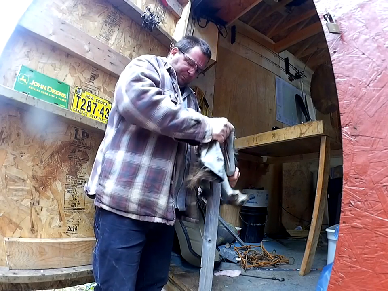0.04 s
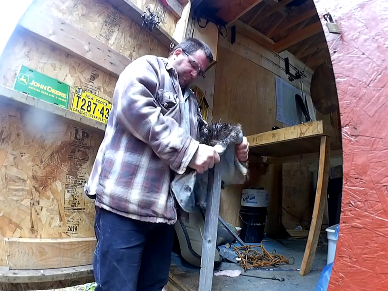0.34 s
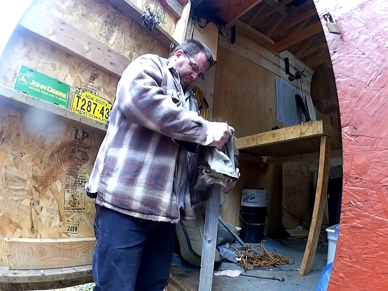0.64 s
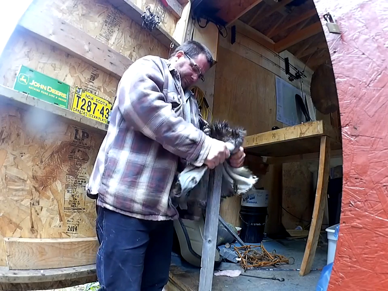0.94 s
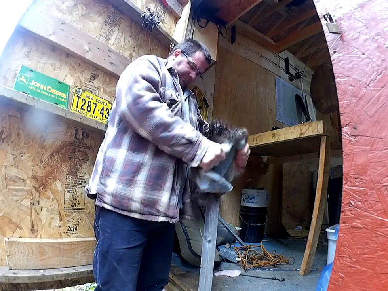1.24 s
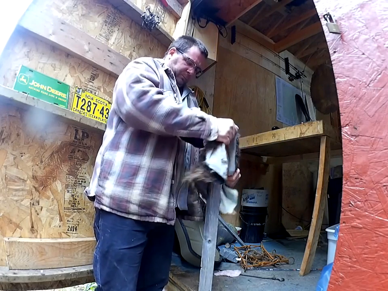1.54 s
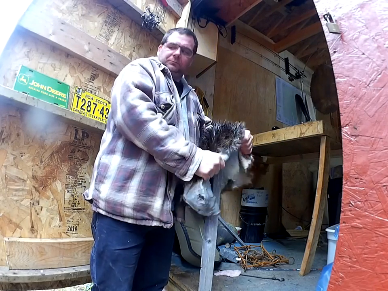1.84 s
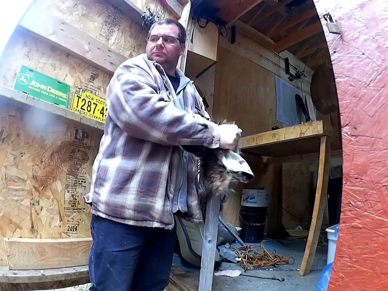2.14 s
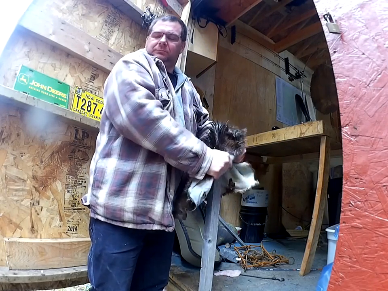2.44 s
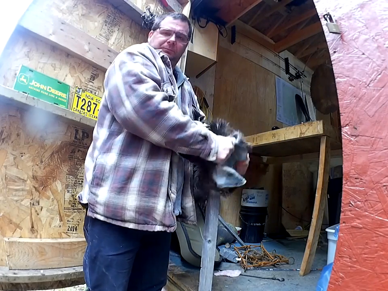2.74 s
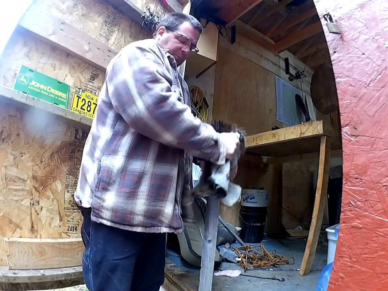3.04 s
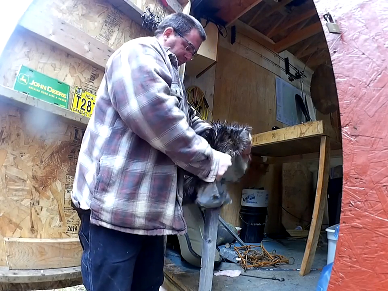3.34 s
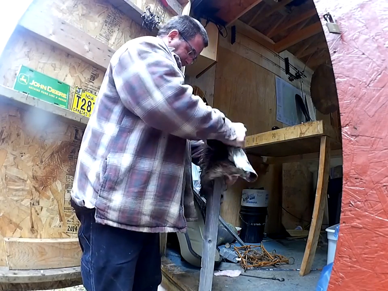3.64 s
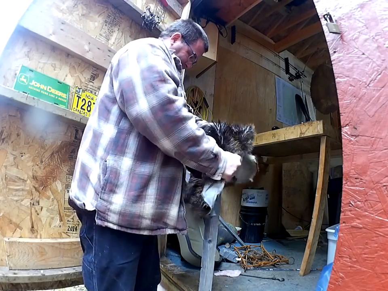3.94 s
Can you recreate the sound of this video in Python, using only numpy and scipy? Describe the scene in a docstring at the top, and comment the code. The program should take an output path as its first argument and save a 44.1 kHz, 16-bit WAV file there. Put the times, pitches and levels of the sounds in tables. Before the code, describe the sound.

Rhythmic, dry scraping of a hide pulled over a wooden post in a small shed.

```python
"""In a small shed, a hide is pulled back and forth over a wooden post, about four strokes a second.
Fibres rasp and the skin chatters on the post's edge, swelling with the speed of each pull; the post
rings hollowly and the loose hide flaps and taps. Between some strokes the skin creaks as it tightens;
once it snaps taut and once it squeaks. Board walls answer briefly over a quiet hush."""
import sys
import numpy as np
from scipy import signal
from scipy.fft import rfft, irfft
from scipy.io import wavfile
from scipy.ndimage import map_coordinates

SR = 44100
rng = np.random.default_rng(int(sys.argv[2]) if len(sys.argv) > 2 else 0)


def generate_wav(sig):
    """Save sig (samples, or channels by samples) to the path in sys.argv[1] as 16-bit PCM at SR."""
    pcm = np.round(np.clip(np.atleast_2d(sig).T, -1, 1) * 32767).astype(np.int16)
    wavfile.write(sys.argv[1], SR, pcm)


N = 176400  # 4 seconds


def undb(db):
    """Turn decibels into a number to multiply by."""
    return 10 ** (np.asarray(db) / 20)

def unit(x):
    """Scale a sound to an average (rms) strength of 1."""
    return x / np.sqrt(np.mean(x ** 2))

def curve(points):
    """Join (f/Hz, level/dB) points into a level for every frequency."""
    hz, db = np.array(points, float).T
    return np.interp(np.log(np.arange(N // 2 + 1) * SR / N + 1e-9), np.log(hz), db)

def colour(x, points):
    """Shape a sound's lows and highs to follow (f/Hz, level/dB) points."""
    cepstrum = irfft(np.log(undb(curve(points))), N)
    fold = 1 + np.sign(N / 2 - np.arange(N))  # so the filter never sounds before its input
    fold[0] = 1
    response = irfft(np.exp(rfft(cepstrum * fold)), N)[:N // 20]
    return signal.fftconvolve(x, response)[:N]

def ring(x, hz, width_hz):
    """Make a sound ring at one pitch; a narrower width rings longer."""
    return signal.lfilter(*signal.iirpeak(hz, hz / width_hz, fs=SR), x)

def wander(hz):
    """Drift between random values of size about 1, hz times a second."""
    knots = np.arange(N) / SR * hz
    return unit(np.interp(knots, np.arange(N), rng.standard_normal(N)))

def stereo(mid, side, width):
    """Make left and right from a centre sound and an unrelated one that widens it."""
    side = colour(side, width)
    return np.array([mid + side, mid - side])

def clicks(table, shape):
    """Play one short sound at each (t/s, peak level/dB)."""
    out = np.zeros(N)
    for start, db in table:
        i = int(start * SR)
        out[i:] += undb(db) * shape[:N - i] / np.abs(shape).max()
    return out


# tone of the hush: f/Hz, level/dB
HUSH_TONE = [(20, -25.5), (60, -13.5), (100, 0.5), (200, 1.5), (300, -3), (600, 0.5), (900, 2.5),
             (1400, -2), (2000, -3), (2500, 0), (3200, -8), (4200, -15), (5800, -28.5), (9000, -43)]
# how wide the hush and the echo sound: f/Hz, side level against centre/dB
ROOM_WIDTH = [(60, -14), (250, -7.5), (600, -7.5), (1200, -5), (2400, -3), (4500, -1.5), (8000, 10.5),
              (15000, -5.5)]
HUSH_DB, WAVER_DB = -70.5, -1.77
def hush():
    """A quiet background noise wavers slightly."""
    mid, side = (colour(rng.standard_normal(N), HUSH_TONE) for _ in range(2))
    return unit(stereo(mid, side, ROOM_WIDTH)) * undb(HUSH_DB + WAVER_DB * wander(hz=14))

ECHO_FADE_S, ECHO_DB, FIRST_ECHO_S = 0.28, -12.5, 0.0057
def shed_echo(x):
    """The board walls throw the sound back as a short blur of echoes."""
    t = np.arange(N) / SR
    fade = (t > FIRST_ECHO_S) * undb(-60 * t / ECHO_FADE_S)
    tail = stereo(*(rng.standard_normal((2, N)) * fade), ROOM_WIDTH)[:, :SR // 2]
    tail = tail / np.sqrt(np.sum(tail ** 2) / 2)
    return undb(ECHO_DB) * signal.fftconvolve(x.mean(axis=0)[None], tail, axes=1)[:, :N]

# each tap: t/s, peak level/dB
TAPS = [(.6545, -46), (.659, -54), (1.414, -54), (2.969, -50)]
# tone of a tap: f/Hz, level/dB
TAP_TONE = [(100, -5), (500, -5), (1050, 12.5), (1700, -0.5), (2700, 3), (4200, -18), (6000, -63)]
def taps():
    """The hide taps dully against the post."""
    return clicks(TAPS, colour(signal.unit_impulse(N), TAP_TONE))

# each tick of a creak: t/s, peak level/dB
CREAKS = [(.151, -60), (.169, -57), (.181, -61), (.191, -62), (.988, -43), (1.643, -50), (1.659, -70),
          (1.671, -55), (1.681, -49.5), (1.699, -50), (2.512, -40), (2.949, -50), (2.970, -55)]
def creaks():
    """The tightening skin creaks in short, ringing ticks."""
    tick = colour(signal.unit_impulse(N), RASP_TONE)
    return clicks(CREAKS, ring(tick, hz=2390, width_hz=260))

# the snap and its two rebounds: t/s, peak level/dB
SNAPS = [(.2005, -29.5), (.2022, -33.5), (.2039, -34)]
# tone of the snap: f/Hz, level/dB
SNAP_TONE = [(100, -30), (550, -8), (1200, -6), (2200, 4.5), (2800, -2), (3800, -21), (5500, -37),
             (8800, -27.5), (12000, -46), (15500, -66)]
def snap():
    """The hide snaps taut and rebounds."""
    return clicks(SNAPS, colour(signal.unit_impulse(N), SNAP_TONE))

SQUEAK_AT_S, SQUEAK_LENGTH_S, SQUEAK_DB = 1.197, 0.042, -47
def squeak():
    """As one stroke sets off, a run of quick slips rings at one pitch."""
    span, gain = swell(SQUEAK_AT_S, SQUEAK_LENGTH_S, skew=1, pan_db=0)
    tone = ring(colour(catches(), RASP_TONE), hz=2540, width_hz=140)
    out = np.zeros((2, N))
    out[:, span] = gain * undb(SQUEAK_DB) * unit(tone[span])
    return out

# tone of the flapping: f/Hz, level/dB
FLAP_TONE = [(15, -44), (40, -32), (70, -14.5), (110, -21), (145, -1), (205, -4.5), (260, -0.5),
             (400, -8.5), (900, -31), (4000, -91)]
def flapping():
    """The loose hide flaps with a soft, low noise."""
    return unit(colour(rng.standard_normal(N), FLAP_TONE))

CATCHES_PER_S, CATCH_SPREAD_DB = 5200, 1
def catches():
    """Single fibres catch and let go at random times, some harder than others."""
    happens = rng.random(N) < CATCHES_PER_S / SR
    size = undb(CATCH_SPREAD_DB * np.minimum(rng.exponential(size=N), 4.5))
    return happens * size * np.sign(rng.standard_normal(N))

def ringing_catches(tone, rings):
    """Catching fibres set a few pitches ringing."""
    drive = colour(catches(), tone)
    return sum(undb(db) * unit(ring(drive, hz, width)) for hz, width, db in rings)

# tone of the low part of the scrape: f/Hz, level/dB
RUB_TONE = [(30, -41), (130, -22), (300, -10), (420, -7), (560, 0), (800, 0.5), (1100, 0.5), (1800, -28.5),
            (5000, -58)]
def low_rub():
    """Catching fibres give the scrape its dull, low body."""
    return colour(catches(), RUB_TONE)

# pitches of the post: f/Hz, width/Hz, level/dB
POST_RINGS = [(331, 43, -12.5), (608, 27, 3.5), (733, 40, -9.5)]
POST_DRIFT = 0.00699  # share of the pitch
def post_ring():
    """The post rings hollowly, and changing pressure on it bends the pitch a little."""
    position = np.cumsum(1 + POST_DRIFT * wander(hz=4))
    return map_coordinates(ringing_catches(RUB_TONE, POST_RINGS), [position], order=1, mode="mirror")

SLIPS_PER_S, SLIP_JITTER, SLIP_SPREAD_DB, SLIP_WIDTH_HZ = 230, .45, 2.5, 150
def skin_slips():
    """The skin sticks and slips in a ragged run, each slip after its own wait."""
    wait, size = rng.standard_normal((N // 20, 2)).T
    at = (np.cumsum(np.exp(SLIP_JITTER * wait)) / SLIPS_PER_S * SR).astype(int)
    strength = undb(SLIP_SPREAD_DB * np.clip(size, -2, 2))
    return colour(np.bincount(at[at < N], strength[at < N], N), RASP_TONE)

# tone of the rasp, also used by slips, creaks and the squeak: f/Hz, level/dB
RASP_TONE = [(30, -59), (150, -45), (450, -24.5), (800, -15), (1050, -9.5), (1250, -10), (1550, -0.5),
             (1850, -3), (2450, 0), (2950, -4.5), (3400, -13.5), (4200, -26.5), (5500, -40), (7200, -32.5),
             (9500, -36.5), (11500, -50), (15500, -76)]
# pitches that ring in the rasp: f/Hz, width/Hz, level/dB
RASP_RINGS = [(1041, 70, -17.5), (1427, 26, -11.5), (1510, 81, -14.5), (2083, 79, -9), (2265, 55, -13),
              (2376, 50, -10.5)]
def fibre_rasp():
    """Thousands of tiny catches blend into a bright rasp."""
    return unit(colour(catches(), RASP_TONE)) + ringing_catches(RASP_TONE, RASP_RINGS)

# how wide the scrape sounds: f/Hz, side level against centre/dB
SCRAPE_WIDTH = [(200, -18), (600, -19), (1200, -15.5), (2400, -8), (4000, -8), (7000, -8.5), (9000, -0.5)]
def along_edge(source):
    """Spread a sound left and right, along the post's edge and nearby boards."""
    return stereo(unit(source()), unit(source()), SCRAPE_WIDTH)

SPEED_POWER = 2.19
def swell(start, length, skew, pan_db):
    """Rubbing grows and fades with a pull's speed; gives its samples and left and right gains."""
    span = np.arange(max(int(start * SR), 0), min(int((start + length) * SR), N))
    progress = np.clip((span / SR - start) / length, 0, 1)
    speed = np.abs(np.sin(np.pi * progress ** skew))
    return span, speed ** SPEED_POWER * undb(np.array([[pan_db], [-pan_db]]) / 2)

# each pull: t/s, length/s, skew (under 1 is fastest early), chatter f/Hz,
# level/dB at full speed of rasp, rub, post, chatter and flap, then left minus right/dB
STROKES = [(-.045, 0.16, 0.79, 2460, -45.5, -53.5, -57, -57, -63.5, -1),
           (0.177, 0.2, 0.96, 2510, -45.5, -53.5, -74, -52, -69.5, -1.5),
           (0.454, 0.16, 0.82, 2270, -43.5, -52.5, -68, -47.5, -62, -1.5),
           (0.7, 0.17, 0.83, 2440, -44.5, -52.5, -62.5, -51, -68.5, -1),
           (0.943, 0.17, 0.97, 2230, -45, -53, -60.5, -45, -67.5, -1),
           (1.191, 0.17, 0.77, 2300, -45, -54, -55.5, -49.5, -67, -1),
           (1.434, 0.19, 0.78, 2170, -45, -54, -59.5, -51.5, -69.5, -1),
           (1.707, 0.18, 0.79, 2250, -45, -53, -56.5, -49, -69.5, -0.5),
           (1.95, 0.2, 0.88, 2250, -47.5, -56.5, -59.5, -63, -66.5, -1),
           (2.221, 0.18, 1, 2380, -46, -54, -55.5, -52.5, -68, -1.5),
           (2.474, 0.19, 0.78, 2316, -46, -55.5, -56.5, -54.5, -66.5, -1),
           (2.726, 0.17, 0.86, 2084, -45, -52, -57, -49, -67, -1),
           (2.979, 0.18, 0.88, 2330, -45.5, -55, -56, -47, -66, -1),
           (3.237, 0.17, 0.9, 2340, -45, -55.5, -51.5, -53, -69.5, -1),
           (3.485, 0.18, 0.76, 2320, -47, -56, -55, -52.5, -68.5, -1),
           (3.742, 0.2, 0.78, 2190, -47.5, -55, -59, -51.5, -70, -.5)]
GRIP_HZ, GRIP_DB, FLAP_LAG_S = 172.5, 0.19, 0.036
def scrape():
    """In each pull fibres rasp, the post rings, the skin chatters and, just after, the hide flaps."""
    rasp = along_edge(fibre_rasp)
    rub = along_edge(low_rub)
    post = along_edge(post_ring)
    slips = along_edge(skin_slips)
    flap = flapping()
    grip = undb(GRIP_DB * wander(GRIP_HZ))  # the grip on the edge varies quickly
    out = np.zeros((2, N))
    for start, length, skew, chatter_hz, rasp_db, rub_db, post_db, chatter_db, flap_db, pan_db in STROKES:
        span, gain = swell(start, length, skew, pan_db)
        friction = grip[span] * (undb(rasp_db) * rasp[:, span] + undb(rub_db) * rub[:, span])
        chatter = undb(chatter_db) * unit(ring(slips[:, span], chatter_hz, SLIP_WIDTH_HZ))
        out[:, span] += gain * (friction + undb(post_db) * unit(post[:, span]) + chatter)
        span, gain = swell(start + FLAP_LAG_S, length, skew, pan_db)
        out[:, span] += gain * undb(flap_db) * unit(flap[span])
    return out

def scene():
    """The hide on the post, the shed's echo and the hush."""
    direct = scrape() + squeak() + creaks() + taps() + snap()
    return direct + shed_echo(direct) + hush()

# balance of the two microphones: f/Hz, left minus right/dB
MIC_BALANCE = [(60, -1), (300, -1), (600, -1.5), (1100, -1.3), (2200, 0.6), (9000, 1)]
# tone of their hiss: f/Hz, level/dB
HISS_TONE = [(3000, -17), (5800, -8), (7300, 0), (9000, 1.5), (11000, -3), (13000, -9), (15500, -21)]
HISS_DB, TOP_HZ = -85, 15700
def record(dry):
    """Two microphones hiss and differ a little in tone; one thin band and the very top are cut."""
    half = curve(MIC_BALANCE) / 2
    hiss = np.array([unit(colour(rng.standard_normal(N), HISS_TONE)) for _ in range(2)])
    heard = irfft(rfft(dry) * undb(np.array([half, -half])), N) + undb(HISS_DB) * hiss
    heard = heard - ring(heard, hz=7930, width_hz=310)
    return signal.sosfilt(signal.ellip(8, .2, 70, TOP_HZ, fs=SR, output="sos"), heard)


dry = scene()
out = record(dry)
generate_wav(out)
```